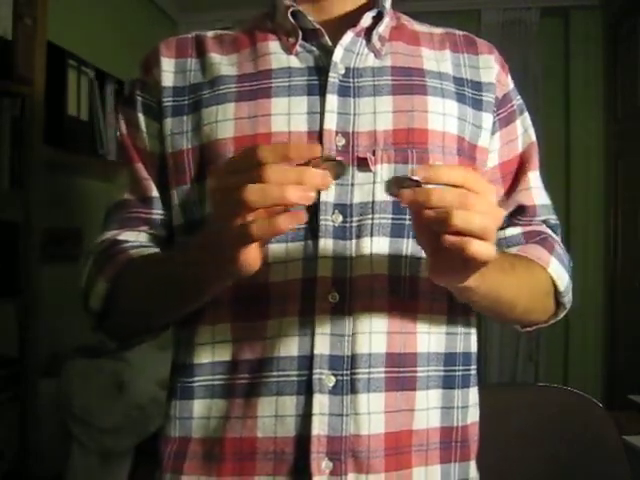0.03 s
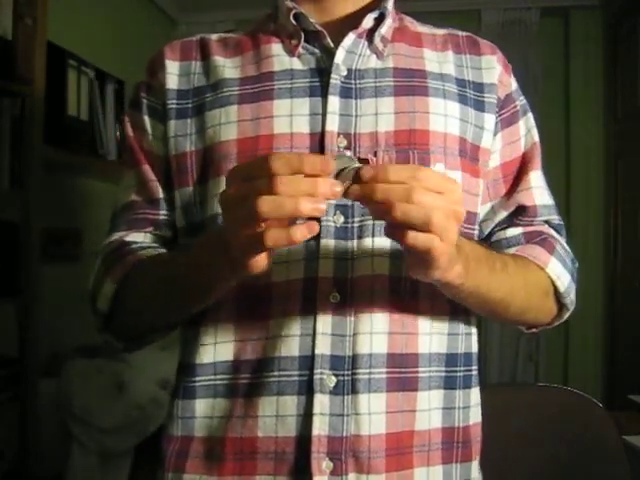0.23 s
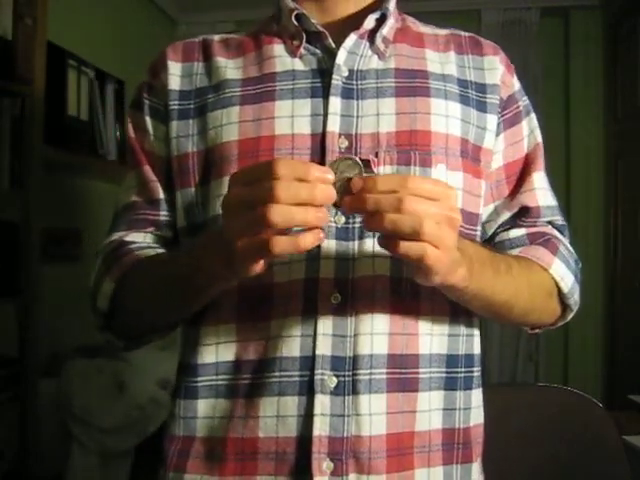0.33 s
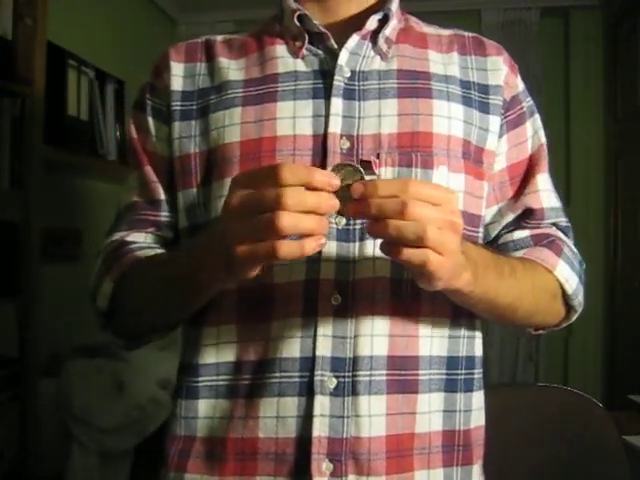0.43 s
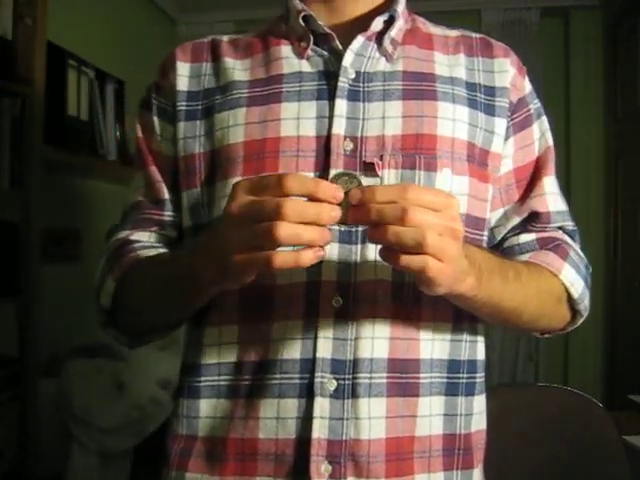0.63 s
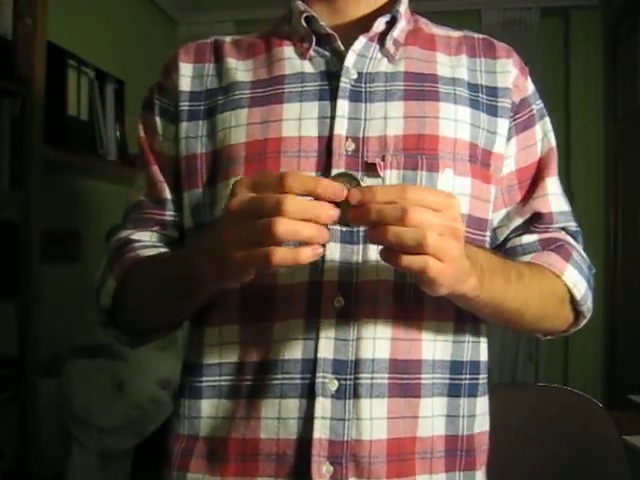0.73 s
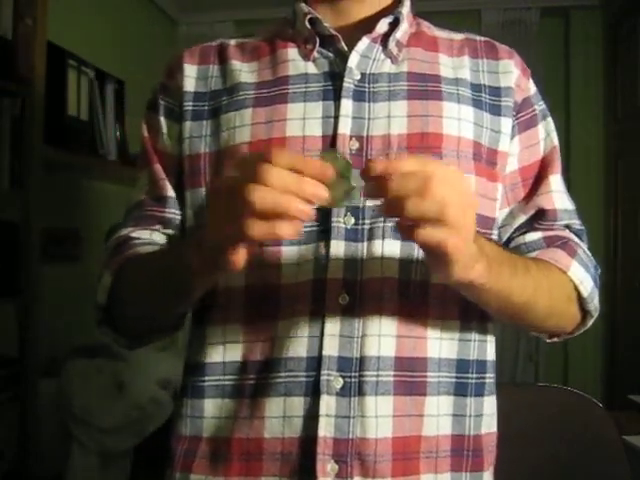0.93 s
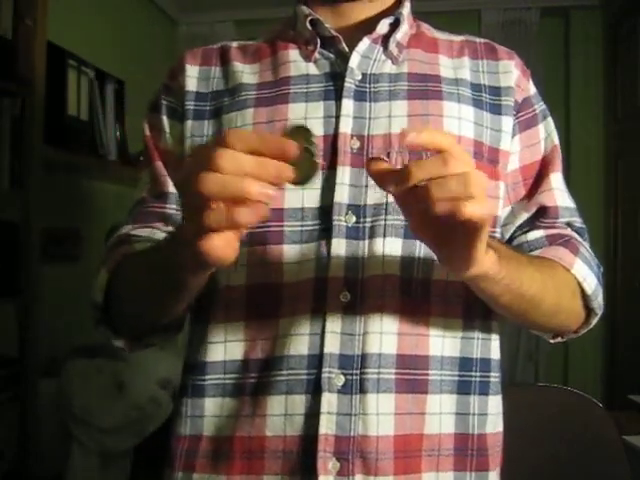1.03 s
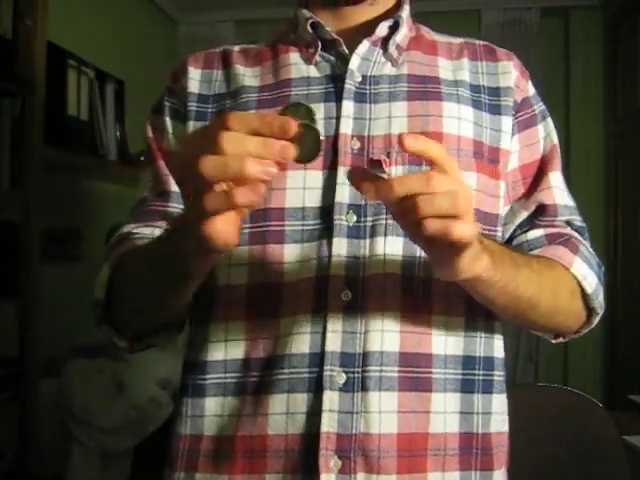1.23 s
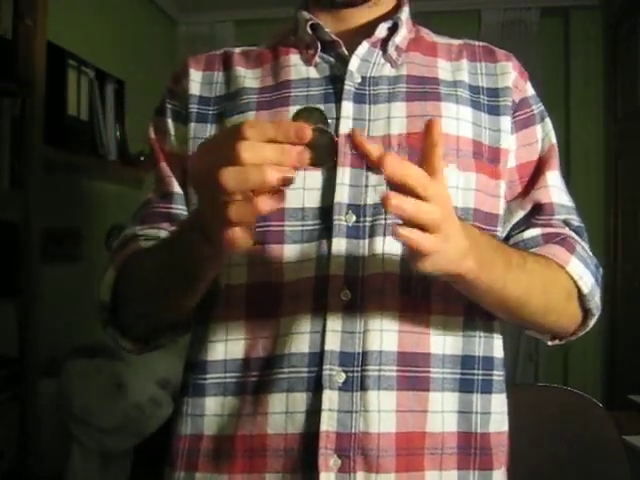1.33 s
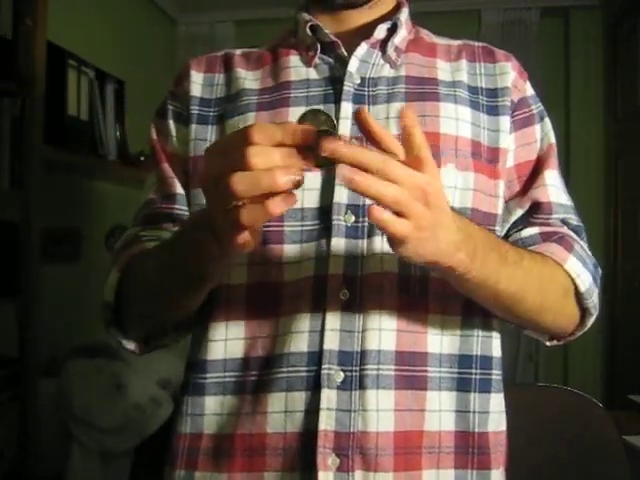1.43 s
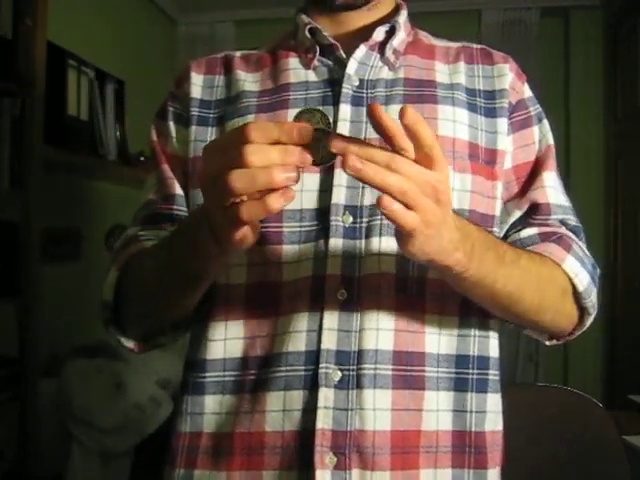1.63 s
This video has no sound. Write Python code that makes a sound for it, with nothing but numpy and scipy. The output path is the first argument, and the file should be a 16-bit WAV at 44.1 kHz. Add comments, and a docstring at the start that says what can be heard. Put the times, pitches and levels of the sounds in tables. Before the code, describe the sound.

Two coins knock together a few times, their bright ring stopped at once by the fingers. A tiny scrape and a last tap follow, then faint ticks after a pause, over steady hiss and whine in a small room.

```python
"""Two coins clink

Pinched in the fingers in a small quiet room, two coins knock together a few times, and the grip quickly
stops their ringing. A rim scrapes briefly over a face, a last tap follows, and later the fingers shift
a coin with faint ticks. The recorder adds hiss, hum and a thin whine, and turns itself down under the
clink. A low drone fades away in the background."""
import sys
import numpy as np
from scipy import signal
from scipy.fft import rfft, irfft, next_fast_len
from scipy.io import wavfile
from scipy.ndimage import uniform_filter1d, map_coordinates

SR = 44100
rng = np.random.default_rng(int(sys.argv[2]) if len(sys.argv) > 2 else 0)


def unload_audio(sound):
    """Save the sound as a 16-bit wav file, at the path given as the first command line argument."""
    columns = np.transpose(np.atleast_2d(sound))
    # keep every value between -1 and 1, then stretch to whole-number steps
    steps = np.round(np.clip(columns, -1, 1) * 32767)
    wavfile.write(sys.argv[1], SR, steps.astype(np.int16))


N = 74970


# The high notes of a held coin: f/Hz, level/dB relative to the ring, base time to fade by 60 dB/s
COIN_NOTES = [(8000, -24, 0.021), (8626, -1, 0.025), (9600, -34, 0.014), (11140, -28, 0.019),
              (11900, -26, 0.033), (14400, -17, 0.0058)]
# Tone colour of the sharp crack, before each knock tilts it: f/Hz, relative level/dB
CRACK_COLOUR = [(100, -30), (1500, -22), (3000, -8), (3500, -5.5), (4300, 4), (6000, -5.5), (8500, 7),
                (9900, -17), (10600, -19), (11100, 6.5), (12900, -3.5), (15500, -14)]
# One row per knock; the grip sets the pitch of the lowest note, in which the coin bends:
# t/s, ring level/dB, fade time factor, bend level/dB, bend f/Hz, crack level/dB,
# crack tilt/dB per octave, push level/dB
KNOCKS = [(.1538, -2, 0.85, -17, 4676, -19, -10, -30), (.1696, -13, 1.3, -14, 4820, -5, 1, -13.5),
          (.1763, -20, .7, -30, 4800, -11, 7, -29), (0.1805, -24, 0.5, -21.5, 4845, -20, 12, -42),
          (0.211, -10, 0.66, -39, 4730, -47, 8, -50), (0.2187, -17, 1.2, -34, 4870, -44, -1, -53),
          (0.3075, -17, 0.41, -35, 4620, -25.5, -7.5, -54)]

def clinks():
    """Each knock pushes the air, cracks and sets the coins ringing; the fingers soon still them."""
    out, t = np.zeros(N), np.arange(SR // 8) / SR
    push_s, attack_s, bend_fade_s, crack_fade_s = .00015, .0003, .026, .006
    push = (1 - t / push_s) * np.exp(-t / push_s)
    attack = 1 - np.exp(-t / attack_s)

    def note(hz, db, fade_s):
        detune = 1 + .002 * rng.normal()
        return amp(db - 60 * t / fade_s) * np.sin(2 * np.pi * hz * detune * t)

    for s, ring_db, stretch, bend_db, bend_hz, crack_db, tilt_db, push_db in KNOCKS:
        bend = note(bend_hz, bend_db, bend_fade_s * stretch)
        ring = sum(note(hz, ring_db + db, fade_s * stretch) for hz, db, fade_s in COIN_NOTES)
        colour = [(hz, db + tilt_db * np.log2(max(hz, 3000))) for hz, db in CRACK_COLOUR]
        crack = noise(colour, len(t)) * amp(crack_db - 60 * t / crack_fade_s)
        add(out, s, (bend + ring) * attack + crack + amp(push_db) * push)
    return out


# How strongly the rim rubs over the face: t/s, relative level/dB
SCRAPE_LEVELS = [(.222, -48), (.227, -34), (.238, -32), (.2425, -35), (.2455, -22), (.251, -33),
                 (.255, -31), (.261, -45), (.275, -58)]
# Where the coins ring when pressed together: f/Hz, width/Hz, relative level/dB
PRESSED_NOTES = [(2380, 1200, -25), (2745, 144, 4.5), (4800, 300, -4), (6020, 520, 0), (7530, 720, -2),
                 (8570, 680, 4), (9400, 180, -10), (12050, 520, 3), (13200, 1200, -9)]

def scrape():
    """Tiny slips over the raised pattern shake the two coins pressed together."""
    def coin_pair(f):
        return sum((-1) ** k * amp(db) * resonance(f, hz, width)
                   for k, (hz, width, db) in enumerate(PRESSED_NOTES))

    slips_per_s, spread_db, boost_db = 3000, 2.5, 3.5
    slipping = rng.random(N) < slips_per_s / SR
    strength = amp(spread_db * rng.standard_normal(N))
    slips = slipping * strength * rng.choice([-1, 1], N)
    rubbing = filtered(slips * level(SCRAPE_LEVELS), coin_pair)
    return amp(boost_db) * rubbing / np.std(filtered(slips, coin_pair))


# The fingers shift a coin: t/s, level/dB
FINGER_TICKS = [(1.4331, -42), (1.445, -36), (1.4495, -40)]
# Tone colour of a tick: f/Hz, relative level/dB
TICK_COLOUR = [(300, -24), (2300, -27), (3700, 7), (4900, -16), (6300, 3), (8400, 3), (10000, -22),
               (15000, -32)]

def finger_ticks():
    """A coin makes dry little ticks as the grip changes."""
    out, t = np.zeros(N), np.arange(SR // 20) / SR
    fade_s = .011
    for s, db in FINGER_TICKS:
        add(out, s, amp(db - 60 * t / fade_s) * noise(TICK_COLOUR, len(t)))
    return out


# Echoes from nearby surfaces: delay t/s, relative level/dB
NEAR_ECHOES = [(.0063, -16.5), (.0092, -16), (0.0179, -17)]
# How long the room rings: f/Hz, time to fade by 60 dB/s
TAIL_FADES = [(300, 0.083), (2800, 0.39), (4900, 0.33), (8500, 0.14), (14000, 0.16)]
# Tone colour of that ringing: f/Hz, relative level/dB
TAIL_COLOUR = [(200, -39), (2000, -4), (5000, -3), (8500, 6), (10000, 13), (11500, 3), (15500, 7.5)]

def room(x):
    """Sound bounces off nearby surfaces, then many echoes blur into a short tail."""
    onset_s, tail_db = .02, -9.5
    hz, t, spectrum = signal.stft(rng.standard_normal(SR // 2), SR, nperseg=256)
    shape = amp(along(TAIL_COLOUR, hz)[:, None] - 60 * t / along(TAIL_FADES, hz)[:, None])
    tail = signal.istft(spectrum * shape, SR, nperseg=256)[1]
    tail *= 1 - np.exp(-(np.arange(len(tail)) / SR / onset_s) ** 3)
    early = filtered(x, lambda f: sum(amp(db) * np.exp(-2j * np.pi * f * s) for s, db in NEAR_ECHOES))
    return early + amp(tail_db) * signal.fftconvolve(x, tail / np.linalg.norm(tail))[:N]


# Mains hum and a faint electrical tone: f/Hz, average (rms) level/dB
STEADY_TONES = [(48.5, -68), (4140, -70)]

def hum_and_whine():
    """The electronics add two steady tones and a trembling whine with its octave."""
    t = np.arange(N) / SR
    whine_hz, tremble_hz = 7560, 30
    tones = sum(amp(db) * np.sin(2 * np.pi * (hz * t + rng.random())) for hz, db in STEADY_TONES)
    phase = 2 * np.pi * whine_hz * t + .45 * np.sin(2 * np.pi * tremble_hz * t)
    whine = amp(-57.2) * np.sin(phase) + amp(-69) * np.sin(2 * phase)
    return np.sqrt(2) * (tones + whine)


# The low drone dying away: t/s, average (rms) level/dB
DRONE_LEVELS = [(0, -60.5), (.75, -64.5), (1.0, -74), (1.7, -85)]

def drone():
    """A low tone wavers in pitch as it fades."""
    t = np.arange(N) / SR
    pitch_hz, waver_hz, wavers_per_s = 76, 1.9, 8.1
    waver = map_coordinates(rng.standard_normal(64), [t * wavers_per_s])  # a smooth random curve
    phase = 2 * np.pi * np.cumsum(pitch_hz + waver_hz * waver) / SR
    return np.sqrt(2) * level(DRONE_LEVELS) * np.sin(phase)


# Tone colour of the hiss: f/Hz, relative level/dB
HISS_COLOUR = [(20, -25), (31, -20), (42, -2.5), (60, -6), (110, -7.5), (500, -7), (1100, -9), (3200, -13),
               (5500, -15), (6100, -12.5), (6600, -16.5), (8800, -19), (10500, -21), (11350, -16),
               (11900, -24.5), (12600, -21.5), (13800, -18), (14400, -12), (15500, -31.5)]

def hiss():
    """The recorder makes a soft, even noise of its own."""
    return amp(-50) * noise(HISS_COLOUR, N)


def amp(db):
    """Turn decibels into a number to multiply by."""
    return 10 ** (np.asarray(db) / 20)


def along(points, hz):
    """Read between (f/Hz, value) points, with frequency spaced by octaves."""
    f, values = np.transpose(points)
    return np.interp(np.log(hz + 1), np.log(f + 1), values)


def level(rows):
    """A volume curve through (t/s, level/dB) points, silent outside them."""
    return amp(np.interp(np.arange(N) / SR, *np.transpose(rows), left=-120, right=-120))


def filtered(x, response):
    """Multiply each frequency f in x by response(f)."""
    size = next_fast_len(len(x) + SR // 4)
    return irfft(rfft(x, size) * response(np.fft.rfftfreq(size, 1 / SR)), size)[:len(x)]


def noise(colour, size):
    """Noise of average (rms) strength 1, shaped by (f/Hz, level/dB) points."""
    x = filtered(rng.standard_normal(size), lambda hz: amp(along(colour, hz)))
    return x / np.sqrt(np.mean(x ** 2) + 1e-20)


def resonance(f, hz, width):
    """A ringing filter that lets through the frequencies near hz."""
    return 1j * f * width / (hz * hz - f * f + 1j * f * width)


def add(track, s, sound):
    """Mix a sound in, starting at s seconds."""
    part = track[round(s * SR):][:len(sound)]
    part += sound[:len(part)]


def scene():
    """Coins, room and background, the same in both channels."""
    coins = clinks() + scrape() + finger_ticks()
    return np.tile(coins + room(coins) + hum_and_whine() + drone() + hiss(), (2, 1))


def record(dry):
    """The recorder turns down just after loud peaks, comes back up, and cuts the highest treble."""
    t = np.arange(N) / SR
    limit_db, cut_per_db, attack_s, recover_s, top_hz = -21, .48, .016, .034, 15850
    power = np.abs(uniform_filter1d(dry[0] ** 2, size=44))  # averaged over 1 ms
    excess_db = np.maximum(10 * np.log10(power + 1e-12) - limit_db, 0)
    fade = np.exp(-t / recover_s)
    wanted_db = np.maximum.accumulate(cut_per_db * excess_db / fade) * fade  # each peak dies away
    step = 1 / (attack_s * SR)
    cut_db = signal.lfilter([step], [1, step - 1], wanted_db)  # the volume follows a little late
    return np.array([filtered(ch * amp(-cut_db), lambda hz: 1 / (1 + (hz / top_hz) ** 200))
                     for ch in dry])


dry = scene()
out = record(dry)
unload_audio(out)
```